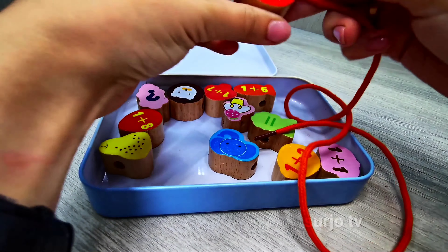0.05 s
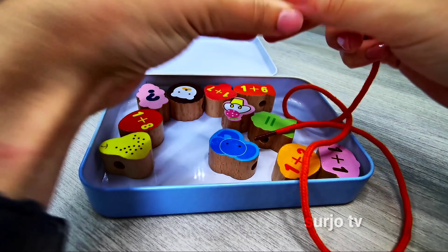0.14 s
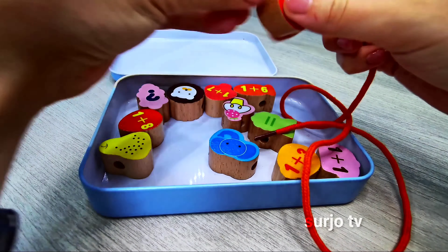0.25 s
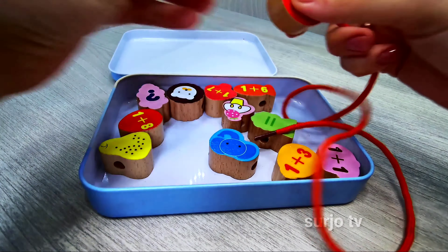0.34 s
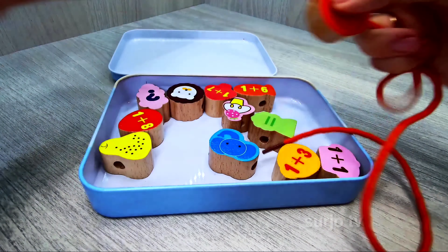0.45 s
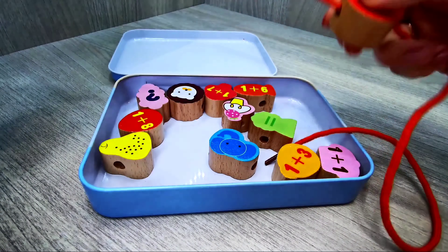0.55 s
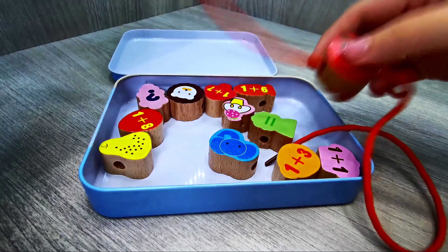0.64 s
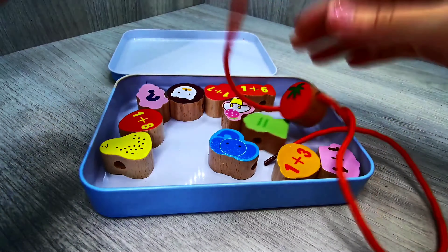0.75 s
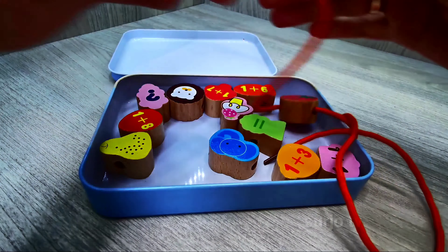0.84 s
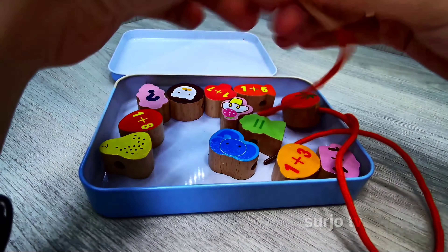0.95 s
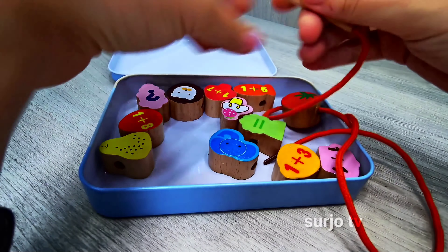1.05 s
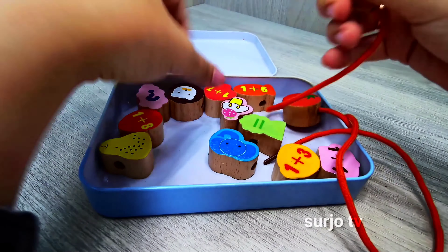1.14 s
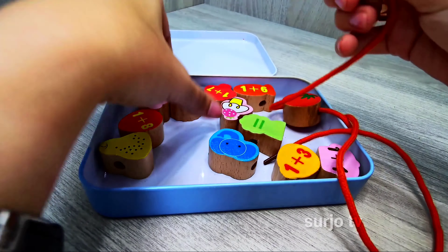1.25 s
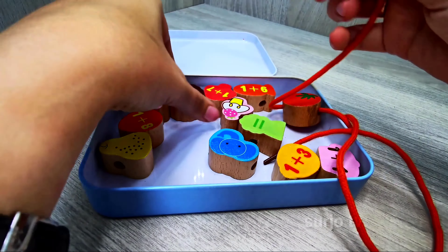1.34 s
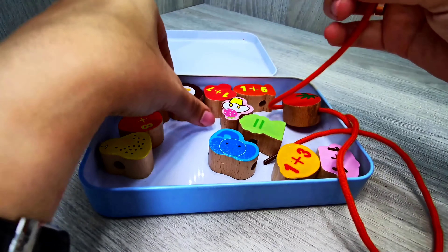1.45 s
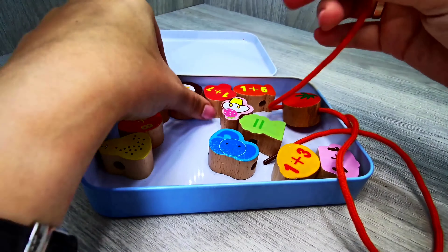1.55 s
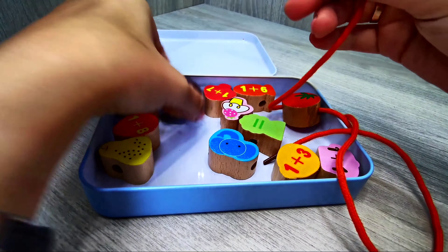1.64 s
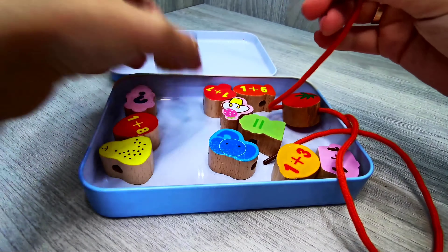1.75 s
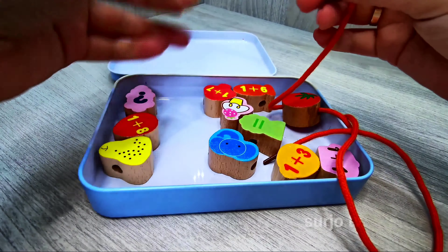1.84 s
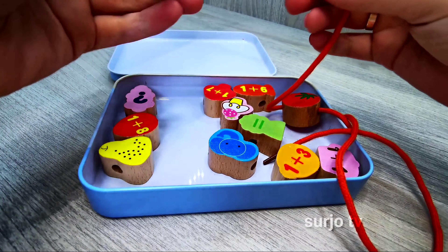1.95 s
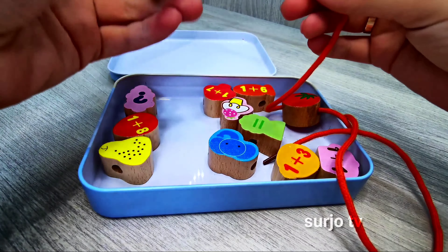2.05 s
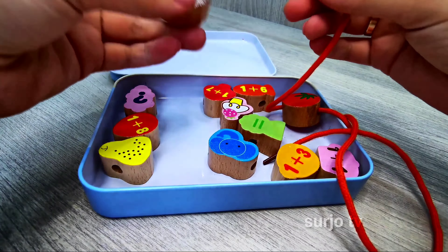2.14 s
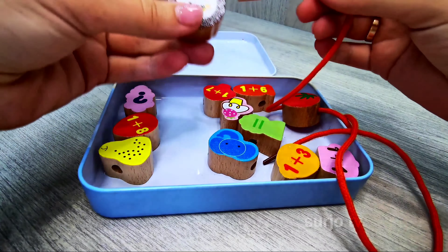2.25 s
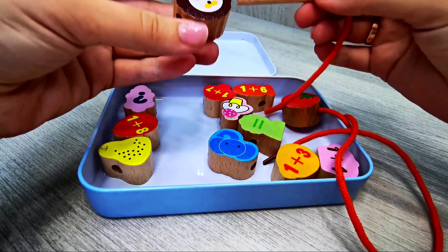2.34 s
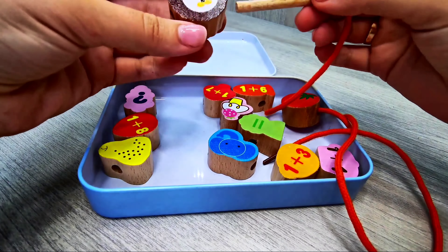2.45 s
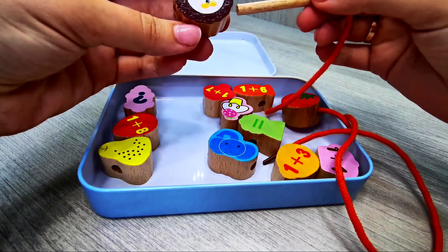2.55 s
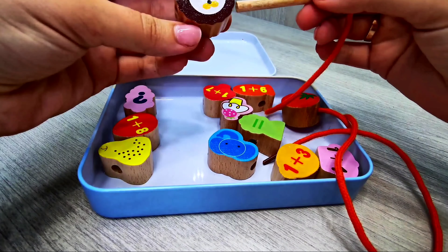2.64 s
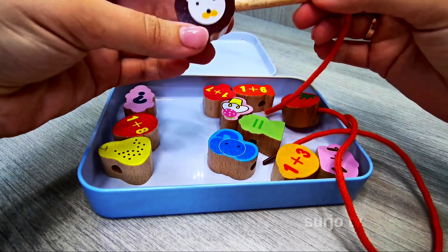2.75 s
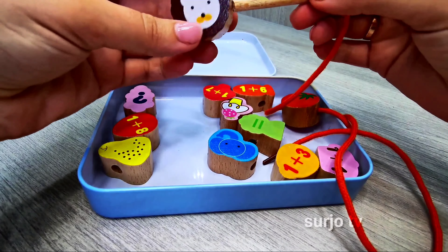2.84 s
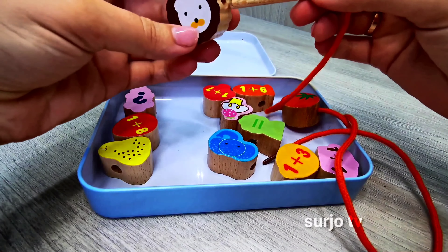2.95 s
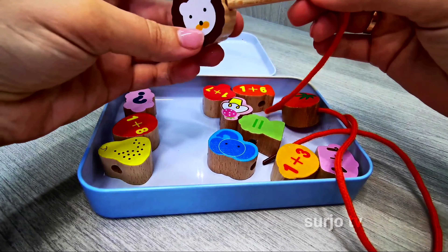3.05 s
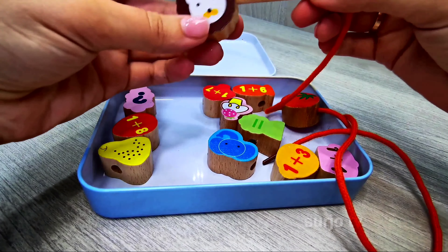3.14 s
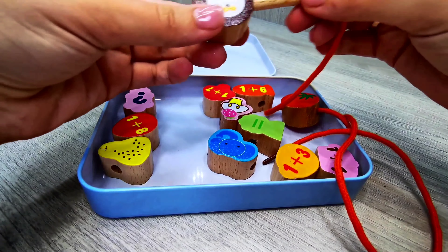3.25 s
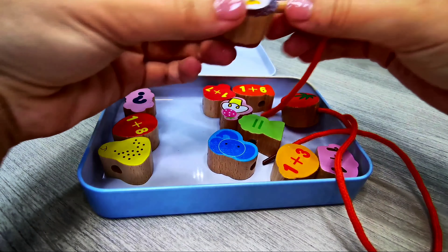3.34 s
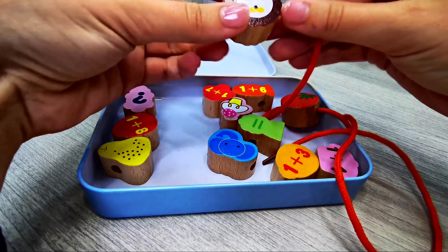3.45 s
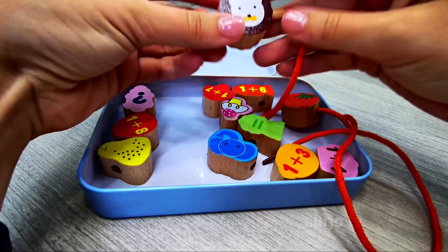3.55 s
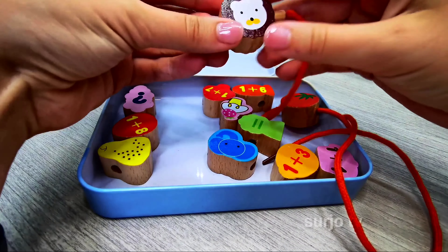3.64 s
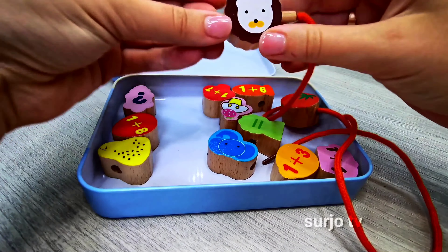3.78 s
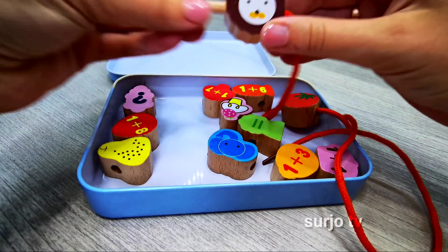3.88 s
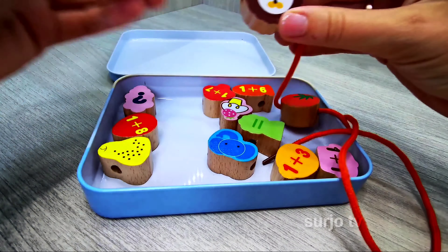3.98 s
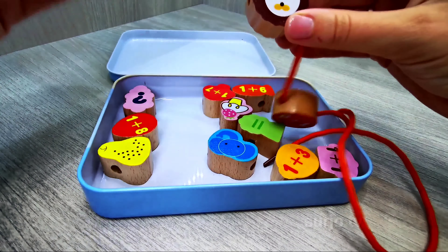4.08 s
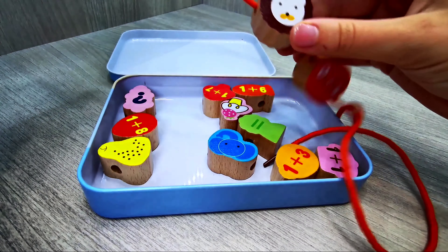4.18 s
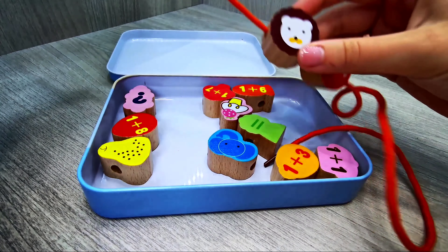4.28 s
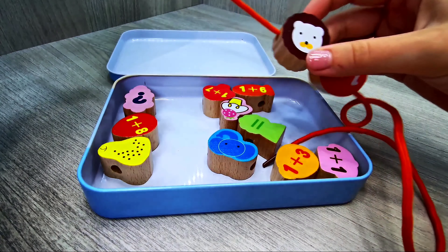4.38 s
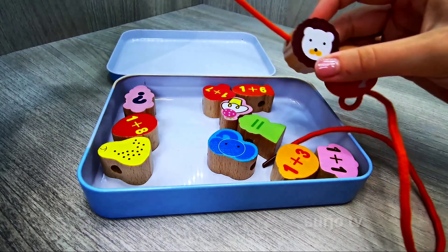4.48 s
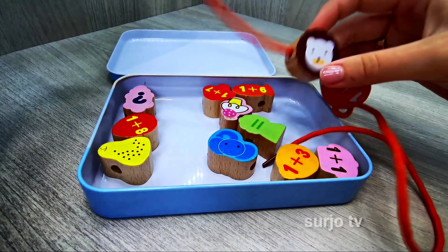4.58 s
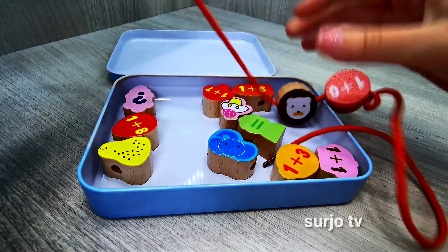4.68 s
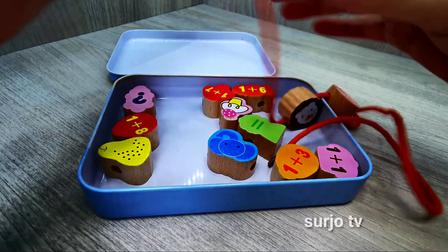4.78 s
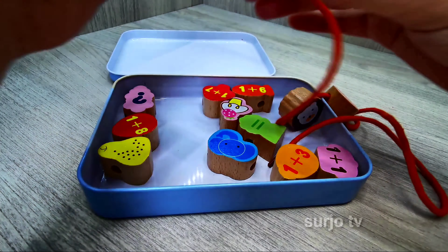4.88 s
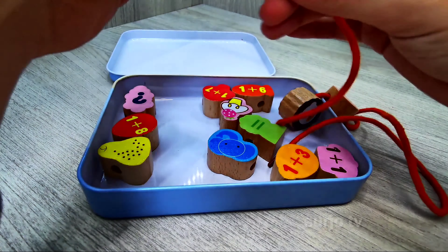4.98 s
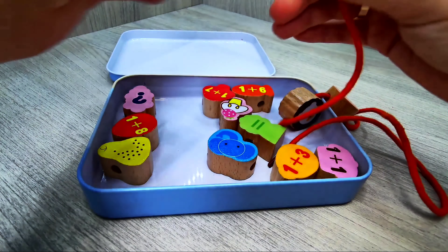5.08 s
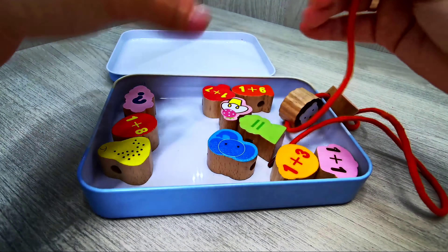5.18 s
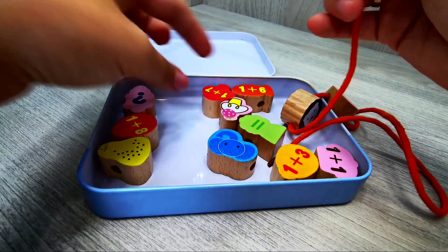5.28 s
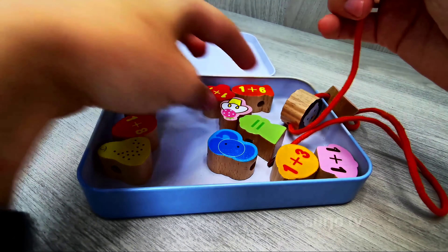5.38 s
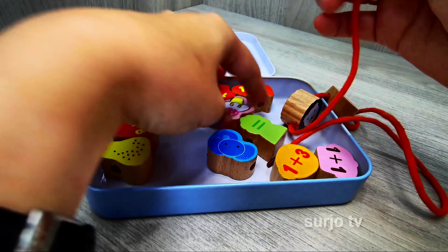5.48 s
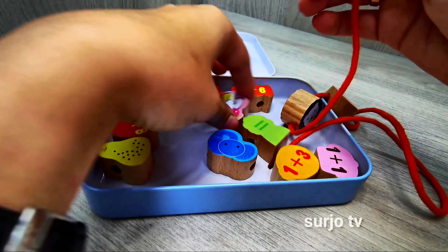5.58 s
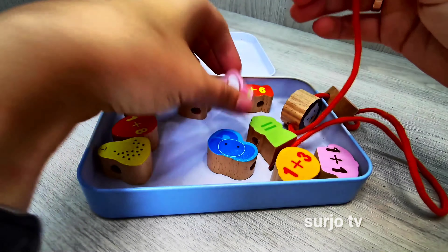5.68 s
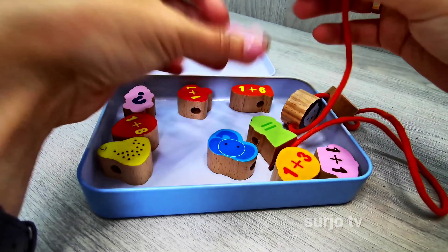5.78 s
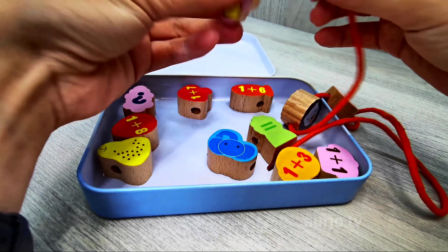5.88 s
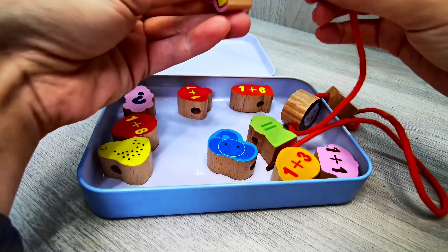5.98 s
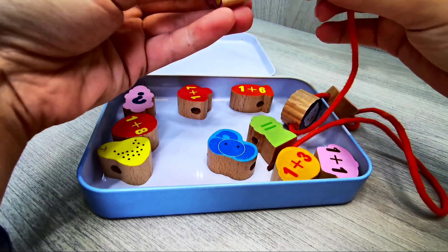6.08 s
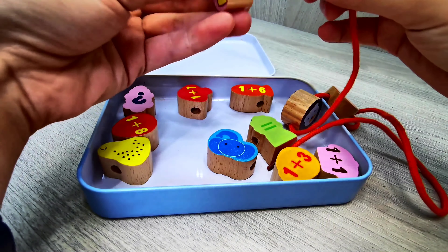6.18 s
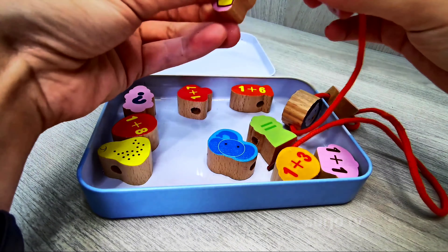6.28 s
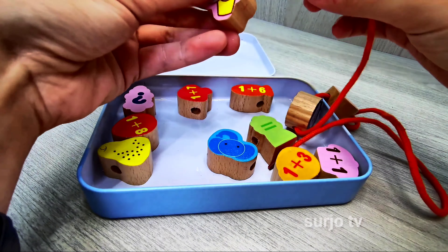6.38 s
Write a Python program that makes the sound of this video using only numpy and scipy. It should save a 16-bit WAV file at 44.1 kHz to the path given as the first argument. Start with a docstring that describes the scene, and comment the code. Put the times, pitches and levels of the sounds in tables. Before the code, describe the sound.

Close, quiet handling of wooden beads on a cord, broken by two sharp, hollow clattering landings in a small metal tin.

```python
"""Wooden beads drop, bounce and slide in a thin metal tin on a table, close to a stereo microphone.
Each blow rings the bead and the tin's modes over a dense metallic wash; slides are many tiny blows.
Beads click in the hands as coloured noise bursts, and the cord rasps through their holes as grainy noise.
The cord hums briefly on two sines; the table rumbles on slow sines and noise; a quiet room hums."""
import sys
import numpy as np
from scipy import signal
from scipy.fft import rfft, irfft, next_fast_len
from scipy.io import wavfile
from scipy.ndimage import uniform_filter1d, map_coordinates

SR = 44100
rng = np.random.default_rng(int(sys.argv[2]) if len(sys.argv) > 2 else 0)


def master_out(mix):
    """Clip the mix to full scale and print it as 16-bit PCM to the path in sys.argv[1]."""
    frames = np.transpose(np.atleast_2d(mix))
    ceiling = np.clip(frames, -1, 1)
    pcm = np.round(ceiling * 32767).astype(np.int16)
    wavfile.write(sys.argv[1], SR, pcm)


def magnitude_from_level(level_db):
    """Linear magnitude for a level in decibels (20 dB per decade)."""
    exponent = np.asarray(level_db, float) / 20
    return 10 ** exponent


N = 283122  # length in samples

# Beads striking the tin. Each row: start in seconds, relative level in dB, thud tilt in dB,
# treble tilt in dB, ring of the bead in Hz.
BLOWS = [(.872, -43, 2, -7, 2000), (0.8887, -6, -22, -17.5, 1510), (.894, -12.5, -15.5, -22, 2370),
         (.909, -16.5, -15.5, -15.5, 1765), (.978, -5.5, -14, -21, 2200), (.986, -16, -11, -21.5, 1560),
         (1.0279, -12.5, -18, -14.5, 2104), (1.035, -21.5, -18, -29, 1490), (1.049, -25, -7.5, -13.5, 2130),
         (1.4567, -36, -9.5, -22, 1790), (1.4597, -24, 1.5, -28, 1750), (1.59, -50, 5.5, -24, 1282),
         (1.601, -32, -31, -17, 1375), (1.608, -15, -20, -25, 2040), (1.617, -29, -5.5, -22.5, 1298),
         (1.665, -41.5, -1, -16.5, 2200), (1.67, -32, -5.5, -26, 2160), (1.787, -41, -25.5, -16, 2310),
         (1.792, -31, -32, -20.5, 3500), (1.801, -31.5, -9, -13.5, 1920), (1.82, -42.5, -9.5, -11.5, 2007),
         (4.259, -23.5, -13, -21, 1830), (4.783, -45.5, -32.5, -27, 2310), (4.8054, -9.5, -19, -18.5, 2405),
         (4.813, -12, -21, -29.5, 1860), (4.905, -28, -8.5, -10.5, 1260), (4.9565, -8.5, -24, -23, 2090),
         (4.962, -13.5, -19, -24.5, 2220), (5.039, -49.5, -2.5, 5.5, 8730), (5.659, -51, -7, -17, 2820),
         (5.689, -41, -18, -40, 1277), (5.724, -32, -33, -29, 1420)]
# Modes of the tin. Each row: frequency in Hz, least width in Hz, relative level in dB.
TIN_MODES = [(81.6, 15, -6.5), (104, 51, -7), (152.6, 40, -1), (337, 12, -16), (400, 27, -3), (655, 18, -5),
             (813, 50, -4), (890, 12, -20), (1261.4, 32, -4.5), (1430, 32, -18), (1680, 60, -13),
             (1805.4, 26, -10.5), (1960, 230, -7), (1990, 70, -14), (2200, 71, -12.5), (2590, 45, -18.5),
             (2810, 70, -17), (3140, 75, -16.5), (3680, 97, -13.5), (4210, 80, -14), (4900, 40, -12.5),
             (5600, 90, -20), (6750, 27, -23), (7100, 270, -29)]
# Dense unresolved modes of the sheet. Each row: frequency in Hz, relative level in dB per Hz.
SHEET_COLOUR = [(200, -33), (400, -6), (700, -19.5), (1250, -12.5), (2320, -12), (3500, -23.5), (6000, -23),
                (11000, -22), (16000, -33.5)]
# Ring time of the sheet when undamped. Each row: frequency in Hz, time to fall 60 dB in seconds.
SHEET_T60 = [(400, 0.2), (1200, 0.043), (3000, 0.1), (5000, 0.11), (14000, 0.014)]
# Left-right likeness of the close sounds. Each row: frequency in Hz, correlation from -1 to 1.
CLOSE_LIKENESS = [(60, 0.97), (180, 0.95), (300, .8), (550, -0.2), (1650, -0.16), (4970, -0.1),
                  (15000, -0.4)]
# Stereo balance of the tin and the clicks. Each row: frequency in Hz, left over right in dB.
TIN_BALANCE = [(60, -1.5), (130, 1.5), (290, 0), (640, 3.5), (1410, 5.5), (3100, 5), (6820, 0.5),
               (15000, 21)]
# Beads sliding over the tin floor. Each row: peak time in seconds, level in dB,
# rise and fall in seconds over 20 dB.
SLIDES = [(.915, -35, .01, 0.055), (.966, -43, .03, 0.019), (1.06, -48, .01, 0.054), (1.15, -65, .1, 0.14),
          (4.83, -32.5, .015, 0.056), (4.875, -24, 0.054, 0.026), (4.915, -31, 0.021, 0.036),
          (4.985, -41, 0.012, 0.062), (5.665, -52, 0.018, 0.045), (5.74, -52, 0.061, 0.06),
          (5.77, -43.5, 0.04, 0.064), (5.82, -47.5, 0.033, 0.057)]
# Wood on wood in the hands. Each row: start in seconds, relative level in dB, ring in Hz,
# treble tilt in dB, pan in dB (8 adds no shift, more leans left).
CLICKS = [(0.097, -29, 800, -18.5, 0), (0.119, -42, 1470, -40, 10), (0.2078, -47.5, 1180, -5.5, 1),
          (0.2338, -56, 6700, 4, -6), (0.3034, -43, 1900, -17, 1), (0.408, -47.5, 6600, -4.5, -5),
          (0.7361, -35, 5530, 1.5, 8), (3.2878, -21.5, 6440, -30, 12), (3.2954, -43.5, 4840, -14, -10),
          (3.555, -42.5, 800, -6, -6.5), (4.4204, -22.5, 2700, -34, 7), (4.5086, -58, 9000, -6, 7),
          (4.5351, -49, 3940, 0.5, 6), (4.5613, -41.5, 5420, -7, 5), (4.593, -44.5, 7060, 5, -5),
          (4.7209, -58, 4010, 2, 1), (4.7473, -57.5, 8030, -5, -2), (5.3717, -51, 698, -13, 7),
          (6.4114, -42, 3410, -23, 9)]
# Cord and fingers rubbing on wood. Each row: peak time in seconds, level in dB,
# rise and fall in seconds over 20 dB, relative level of the low mids in dB.
RUBS = [(.052, -56.5, 0.13, 0.242, -5.5), (.44, -63, 0.024, 0.18, -7), (.6, -43.5, 0.16, 0.19, -16),
        (.725, -40.5, 0.16, 0.036, -24.5), (1.162, -66, 0.1364, 0.011, -11.5),
        (1.21, -65.5, .03, 0.013, -18), (3.046, -75, .03, 0.046, 0.5), (3.19, -74, .02, .04, -5.5),
        (3.31, -65, 0.0097, .1, -7), (3.42, -62.5, 0.096, 0.15, -22), (3.53, -53, 0.095, 0.049, -8.5),
        (3.68, -66.5, .05, 0.078, -12), (3.755, -68, 0.027, .02, -14), (4.09, -51, 0.065, 0.34, -11),
        (4.166, -41.5, 0.019, 0.044, -23), (4.2, -52, 0.054, 0.108, -33), (4.32, -48.5, 0.11, 0.13, -17.5),
        (4.4, -50, 0.094, .04, -25), (4.6, -46.5, 0.062, 0.12, -17), (4.68, -56, 0.11, 0.021, -20),
        (4.875, -38, 0.072, .03, -13), (4.907, -39, 0.0073, 0.06, -26.5), (5.07, -66, 0.021, 0.025, 0.5),
        (5.174, -74, .04, 0.026, -12), (5.37, -77.5, 0.11, 0.1476, -3.5), (5.668, -58, 0.02245, .05, -30),
        (5.742, -46.5, 0.00965, 0.021, -25), (5.78, -50, 0.027, 0.076, -25.5), (6.196, -77, .05, 0.14, -8)]
# Colour of the rasp. Each row: frequency in Hz, relative level in dB per Hz.
RASP_COLOUR = [(1470, -44), (2500, -12.5), (3690, -8.5), (4080, -6), (4840, -10), (7020, -1), (7770, -14),
               (8080, -5), (10600, -6.5), (11600, -11.5), (14100, -15.5), (15000, -11.5), (16000, -11)]
# Colour of the rasp's low mids. Each row: frequency in Hz, relative level in dB per Hz.
LOW_RASP_COLOUR = [(250, -10), (500, 2), (1000, -10), (2500, 3), (3500, 0.5), (5000, -16)]
# Stereo balance of the rubbing. Each row: frequency in Hz, left over right in dB.
RUB_BALANCE = [(60, 20), (130, -8.5), (290, -8.5), (640, 7.5), (1410, 8.5), (3100, 1), (6820, 0.5),
               (15000, 23)]
# Taut cord humming as it runs through the bead. Each row: peak time in seconds, relative level in dB,
# rise and fall in seconds over 20 dB, frequency of the octave in Hz.
CORD_HUMS = [(.553, -54, 0.024, .035, 655)]
# Arms and beads nudging the table top. Each row: peak time in seconds, relative level in dB,
# fall in seconds over 20 dB, centre of the sway in Hz.
NUDGES = [(.122, -44, .04, 68), (.25, -50, .05, 68), (.34, -57, .04, 50), (.44, -47, .045, 76),
          (.56, -56, .08, 62), (.65, -53, .08, 64), (.725, -53, .04, 62), (1.1, -49, .04, 55),
          (1.18, -52, .05, 79), (1.314, -58, .05, 90), (1.505, -47, .03, 100), (1.7, -52, .04, 78),
          (1.88, -64, .1, 72), (2.25, -66, .05, 66), (2.39, -61, .07, 62), (2.56, -65, .04, 75),
          (2.71, -62, .05, 75), (3.42, -66, .05, 73), (3.49, -66, .06, 80), (3.645, -57, .04, 72),
          (3.725, -57, .06, 68), (4.13, -62, .06, 68), (4.22, -59, .06, 68), (4.36, -64, .05, 97),
          (4.43, -63, .06, 98), (4.64, -49, .07, 68), (4.71, -55, .05, 70), (5.07, -53, .05, 80),
          (5.7, -57, .06, 72), (5.94, -55, .07, 75), (6.115, -59, .06, 75)]
# Colour of the table rumble. Each row: frequency in Hz, relative level in dB per Hz.
RUMBLE_COLOUR = [(45, -31), (55, -6.5), (66, 0), (80, 1.5), (98, -4), (115, -12.5), (135, -40)]
# Colour of the quiet room. Each row: frequency in Hz, relative level in dB per Hz.
ROOM_COLOUR = [(12, -29), (20, 4), (81, -8), (113, -25.5), (130, -8), (150, 0), (216, -25), (434, -21),
               (542, -31), (590, -21.5), (897, -28.5), (2080, -30.5), (6360, -37.5), (10800, -36),
               (16000, -39.5)]
# Left-right likeness of the room. Each row: frequency in Hz, correlation from -1 to 1.
ROOM_LIKENESS = [(60, 0.21), (180, 0.96), (550, 0.19), (1650, -0.46), (4970, -0.23), (15000, -1)]
# Stereo balance of the room. Each row: frequency in Hz, left over right in dB.
ROOM_BALANCE = [(60, 0), (180, 0.5), (550, 4.5), (1650, 3), (4970, 0), (15000, 6)]
# Top end of the microphone path. Each row: frequency in Hz, gain in dB.
MIC_TOP = [(15300, 0.5), (15900, -28), (16600, -42)]

REBOUND_S = 0.0095  # a next blow within this time chokes the ring
CHOKED, FREE = 0.78, 1  # factors on the ring time
FIDGET_DB, FIDGET_SWING_DB, FIDGET_LOW_DB = -85, 4, -8.5  # fingers never quite rest
TREMOR_DB, TREMOR_SWING_DB, TREMOR_HZ = -76, 6.5, 67.1  # resting arms keep the table trembling


def unit(x):
    """Scales a signal to rms 1."""
    return x / np.sqrt(np.mean(x ** 2) + 1e-20)


def along(points, hz):
    """Reads (Hz, value) points on a log frequency axis."""
    f, v = np.transpose(points)
    return np.interp(np.log(hz + 1), np.log(f + 1), v)


def wobble(rate):
    """A smooth random curve with rate knots a second."""
    knots = rng.standard_normal(int(N * rate / SR) + 4)
    return map_coordinates(knots, [np.arange(N) * rate / SR])


def strokes(rows, rest_db=-150, rest=0):
    """Size of overlapping strokes over a resting level; a fifth column follows the loudest stroke."""
    t = np.arange(N) / SR
    power = magnitude_from_level(2 * rest_db) + 0 * t
    weighted = power * rest
    for s, db, rise, fall, *value in rows:
        away = np.abs(t - s) / np.where(t < s, rise, fall)
        one = magnitude_from_level(2 * db - 40 * away ** 1.5)  # between a pointed and a round peak
        power = power + one
        weighted = weighted + one * sum(value)
    return np.sqrt(power), weighted / power


def stereo(z, hz, likeness, balance):
    """Turns two unrelated spectra into left and right of the given likeness and balance."""
    turn = np.arccos(np.clip(along(likeness, hz), -1, 1))[:, None] / 2
    half = magnitude_from_level(along(balance, hz) / 2)[:, None]
    mid, side = np.cos(turn) * z[0], np.sin(turn) * z[1]
    return np.array([(mid + side) * half, (mid - side) / half])


def rush(colour, likeness, balance, patchy_db):
    """Stereo noise with patches of random gain; the mean of both sides has rms 1."""
    hz, _, z = signal.stft(rng.standard_normal((2, N)), SR, nperseg=2048)
    patches = uniform_filter1d(rng.standard_normal(z.shape[1:]), size=20, axis=0)
    patches = uniform_filter1d(patches, size=3, axis=1)
    gain_db = patchy_db * unit(patches) + along(colour, hz)[:, None]
    z = stereo(z * magnitude_from_level(gain_db), hz, likeness, balance)
    pair = signal.istft(z, SR, nperseg=2048)[1][:, :N]
    return pair / np.std(pair.mean(0))


def burst(colour, t60, length):
    """Stereo noise in which each frequency dies at its own speed."""
    hz, t, z = signal.stft(rng.standard_normal((2, length)), SR, nperseg=256, noverlap=224)
    gain_db = colour(hz)[:, None] - 60 * t / t60(hz)[:, None]
    z = stereo(z * magnitude_from_level(gain_db), hz, CLOSE_LIKENESS, TIN_BALANCE)
    return signal.istft(z, SR, nperseg=256, noverlap=224)[1][:, :length]


def add(track, s, sound):
    """Mixes a sound in at time s."""
    track[:, round(s * SR):][:, :sound.shape[1]] += sound


def strike(thud_db, treble_db, decay, bead_hz, wash_db):
    """One contact rings the bead and the tin's modes at new strengths over the wash of the sheet."""
    t = np.arange(SR // 4) / SR

    def tilt(hz):
        return along([(180, thud_db + 18), (350, 0.00086), (3000, 0.0018), (5500, treble_db + 19)], hz)

    bead_mode = (bead_hz, 220, -1)  # one broad, short mode
    hz, width, db = np.transpose(TIN_MODES + [bead_mode])[:, :, None]
    width = np.maximum(width, hz / 45)  # the beads lying on the sheet damp its high modes
    draw = rng.standard_normal((len(hz), 3))
    # strength and sign of each mode depend on the spot hit
    spot = magnitude_from_level(3 * draw[:, :1]) * np.sign(draw[:, 2:])
    size = spot * magnitude_from_level(db + tilt(hz)) * np.sqrt(width / 50)
    build_up = 1 - np.exp(-t * hz / 0.3)  # slower for low modes
    dying = np.exp(-np.pi * width * t / decay) * build_up
    # each mode reaches left and right in another phase
    phase = 0.78 * np.arccos(np.clip(along(CLOSE_LIKENESS, hz), -1, 1)) * draw[:, 1:2]
    half = magnitude_from_level(along(TIN_BALANCE, hz) / 2)
    left = (size * dying * half * np.sin(2 * np.pi * hz * t)).sum(0)
    right = (size * dying / half * np.sin(2 * np.pi * hz * t + phase)).sum(0)
    wash = burst(lambda f: along(SHEET_COLOUR, f) + tilt(f), lambda f: decay * along(SHEET_T60, f), len(t))
    crack = 1 + 1.7 * magnitude_from_level(-60 * t / 0.037)  # lifts the first milliseconds
    wash = wash * (1 - np.exp(-t / 0.00075)) * crack
    return magnitude_from_level(-8.5) * np.array([left, right]) + magnitude_from_level(wash_db) * wash


def blows():
    """Beads fall, bounce and knock in the tin; each lands on an edge and rocks through quick contacts."""
    out = np.zeros((2, N + SR))
    gaps = np.diff([row[0] for row in BLOWS] + [np.inf])
    for (s, db, thud_db, treble_db, bead_hz), gap in zip(BLOWS, gaps):
        decay = CHOKED if gap < REBOUND_S else FREE
        sound = magnitude_from_level(db - 2) * strike(thud_db, treble_db, decay, bead_hz, wash_db=7.5)
        add(out, s, sound)
        for late, size in rng.random((4, 2)):
            add(out, s + 0.0005 + 0.007 * late, 0.53 * size * sound)
    return out[:, :N]


def slides():
    """A sliding bead chatters: dense tiny contacts of uneven size shake the tin, damped by its weight."""
    size, _ = strokes(SLIDES)
    places_hz = (800, 1280, 1600, 1900, 2391, 1190)  # ring of the bead at six places on the tin floor
    happens = rng.random((6, N)) < 300 / SR  # about 300 contacts a second at each place
    contacts = happens * rng.standard_normal((6, N))
    contacts = contacts * magnitude_from_level(4 * np.array([wobble(40) for _ in places_hz]))
    shaken = np.zeros((2, N))
    for hits, hz in zip(contacts, places_hz):
        spot = strike(-15, -21.5, 0.76, hz, wash_db=1.5)
        shaken += signal.fftconvolve(hits[None], spot, axes=1)[:, :N]
    return size * shaken / np.std(shaken.mean(0))


def clicks():
    """Hard wood on hard wood: a sharp tick, a broad short ring and a dull knock."""
    out, t = np.zeros((2, N + SR)), np.arange(4096) / SR
    for s, db, ring_hz, treble_db, pan_db in CLICKS:
        def colour(f):
            ring = magnitude_from_level(3) * f / ring_hz / (1 + ((f - ring_hz) / (0.35 * ring_hz)) ** 2)
            tick = magnitude_from_level(treble_db + 5) * f ** 2 / (f ** 2 + 2500 ** 2)
            knock = magnitude_from_level(-18) / (1 + ((f - 700) / 400) ** 2)
            return 20 * np.log10(ring + tick + knock)

        tap = burst(colour, lambda f: along([(1000, 0.084), (8000, 0.036)], f), len(t))
        tap = tap * (1 + 0.71 * magnitude_from_level(-60 * t / 0.03))  # a harder onset
        pan = (pan_db - 8) / 2 * np.array([[1], [-1]])
        add(out, s, magnitude_from_level(db - 9 + pan) * tap)
    return out[:, :N]


def rubbing():
    """Cord fibres catch and slip in the bead hole: a grainy hiss with an uneven pull."""
    fidget_db = FIDGET_DB + FIDGET_SWING_DB * wobble(12)
    size, low_db = strokes(RUBS, fidget_db, FIDGET_LOW_DB)
    grain = magnitude_from_level(1.2 * wobble(25) + 1.6 * wobble(400))
    high = rush(RASP_COLOUR, CLOSE_LIKENESS, RUB_BALANCE, patchy_db=2)
    low = rush(LOW_RASP_COLOUR, CLOSE_LIKENESS, RUB_BALANCE, patchy_db=2)
    return size * grain * (magnitude_from_level(-1.67) * high + magnitude_from_level(low_db) * low)


def cord():
    """The taut cord gives a rough little hum with its fundamental an octave below."""
    size, hz = strokes(CORD_HUMS, rest=CORD_HUMS[0][4])
    phase = 2 * np.pi * np.cumsum(hz * (1 + 0.02 * wobble(76.4))) / SR
    hum = np.sin(phase) + magnitude_from_level(-8.5) * np.sin(phase / 2)
    return size * hum * magnitude_from_level([[3.5], [-0.5]])


def table():
    """Arms and cord shake the table top; it sways at whichever low mode they stir."""
    rows = [(s, db, 0.6 * fall, fall, hz) for s, db, fall, hz in NUDGES]  # the rise is quicker
    size, hz = strokes(rows, TREMOR_DB + TREMOR_SWING_DB * wobble(16), TREMOR_HZ)
    phase = 2 * np.pi * np.cumsum(hz * (1 + 0.075 * wobble(5.6))) / SR
    sway = np.sqrt(2) * np.sin(phase) * magnitude_from_level([[-0.5], [0.5]])
    rumble = rush(RUMBLE_COLOUR, [(30, 0.97), (100, 0.99)], [(30, -1.8), (100, -0.6)], patchy_db=2)
    return size * (magnitude_from_level(-2.5) * sway + magnitude_from_level(-4) * rumble)


def room():
    """Faint hum of the room and hiss of the microphone, as one coloured noise of drifting level."""
    level_db = -66 + 0.86 * wobble(9.7)
    return magnitude_from_level(level_db) * rush(ROOM_COLOUR, ROOM_LIKENESS, ROOM_BALANCE, patchy_db=0.46)


def scene():
    """Everything on and above the table; the small tin radiates no deep bass."""
    bass_cut = signal.butter(2, 58, "high", fs=SR, output="sos")
    tin = signal.sosfilt(bass_cut, blows() + slides())
    return tin + clicks() + rubbing() + cord() + table() + room()


def band_limit(x):
    """A steep low-pass at the top of the band."""
    return signal.sosfilt(signal.butter(12, 16840, fs=SR, output="sos"), x)


def record(dry):
    """The microphone path lets the treble fall away steeply at the top."""
    m = next_fast_len(N + 8192)
    gain = magnitude_from_level(along(MIC_TOP, np.fft.rfftfreq(m, 1 / SR)))
    heard = irfft(rfft(dry, m) * gain, m)[:, :N]
    return band_limit(heard)


dry = scene()
out = record(dry)
master_out(out)
```